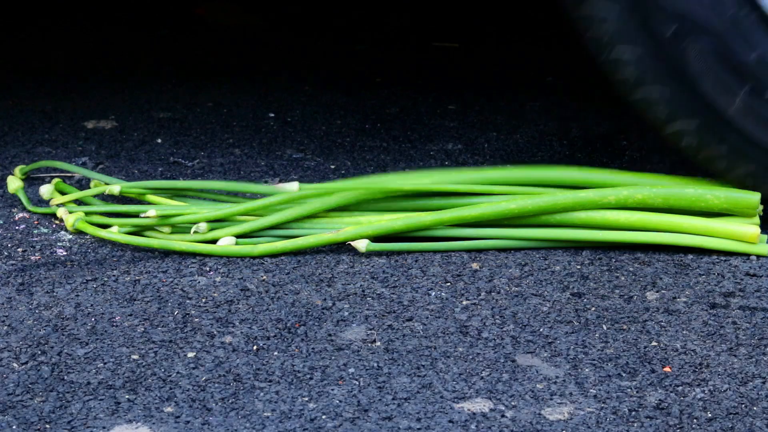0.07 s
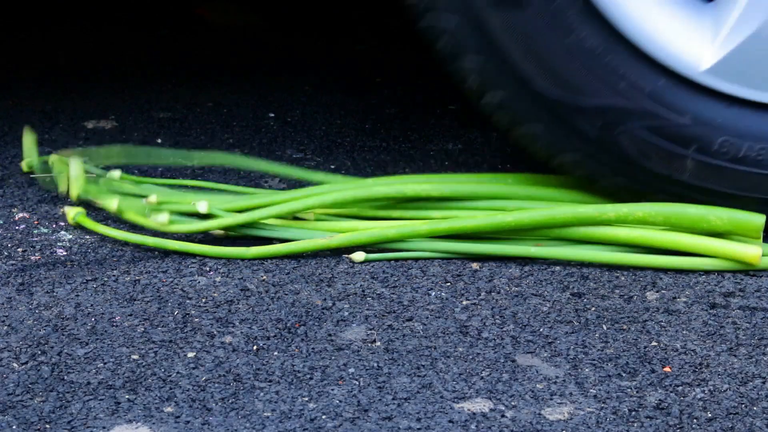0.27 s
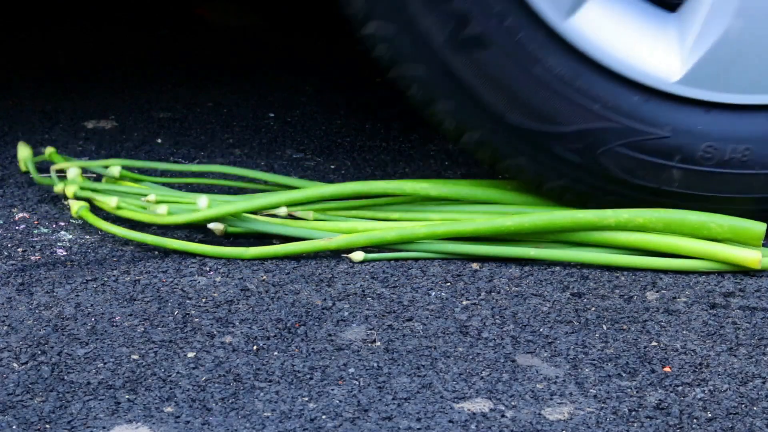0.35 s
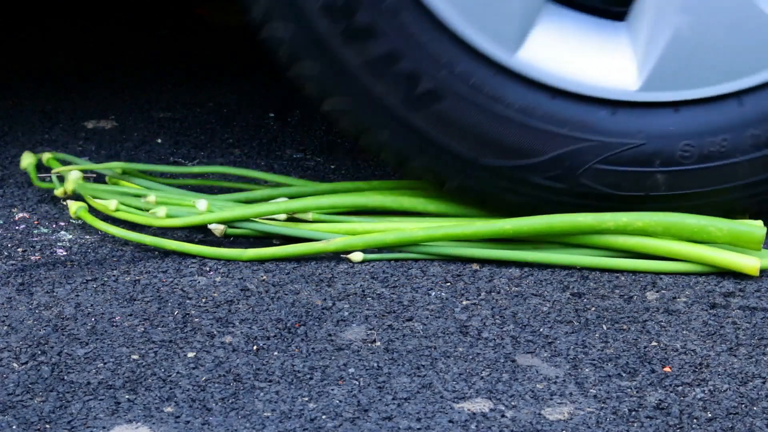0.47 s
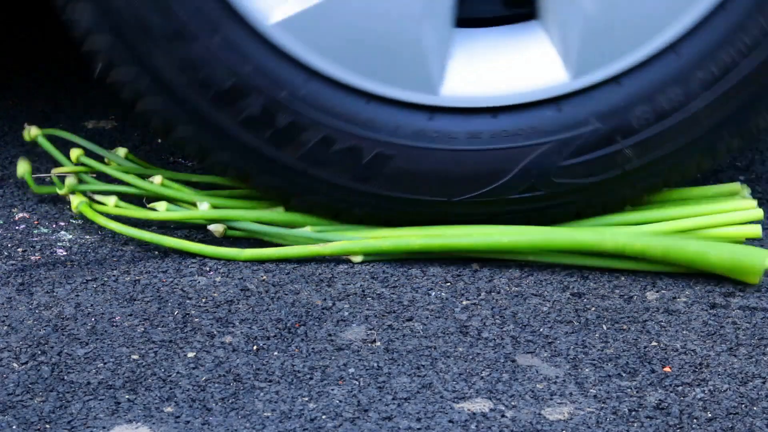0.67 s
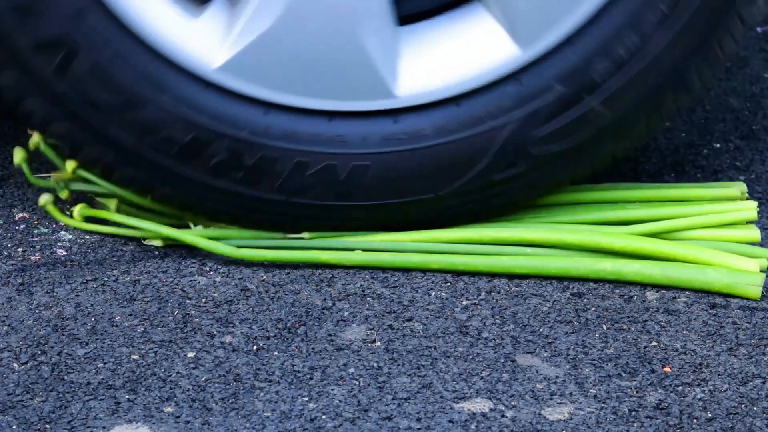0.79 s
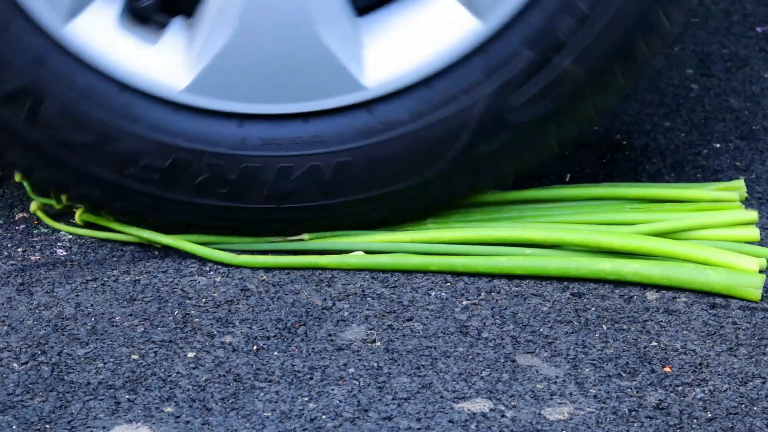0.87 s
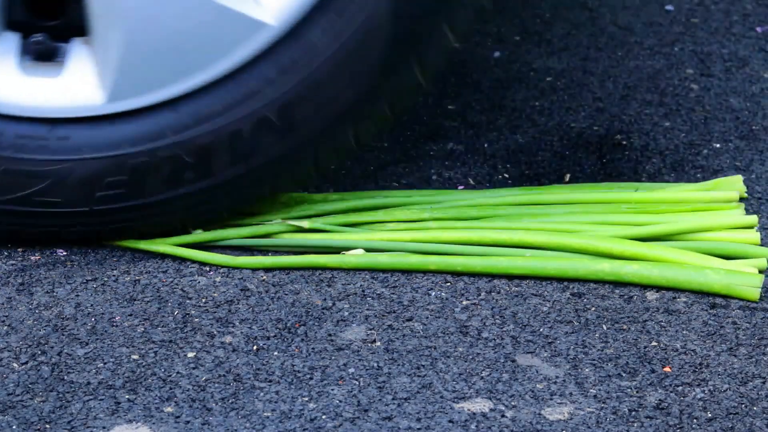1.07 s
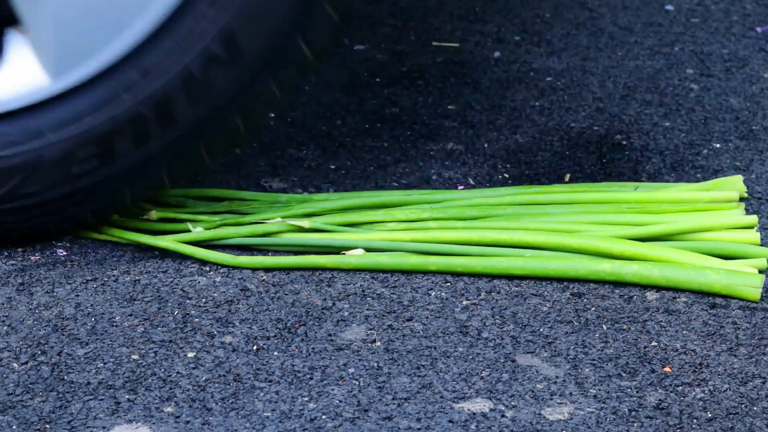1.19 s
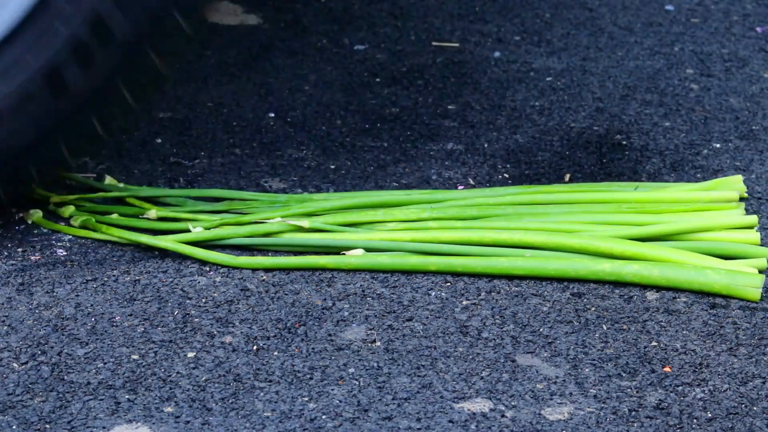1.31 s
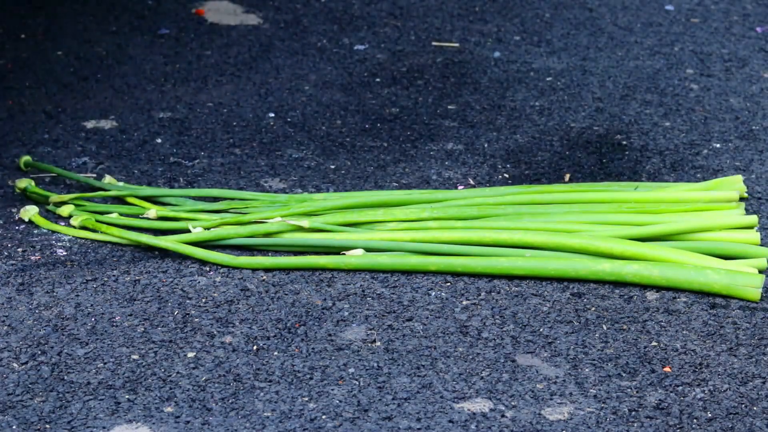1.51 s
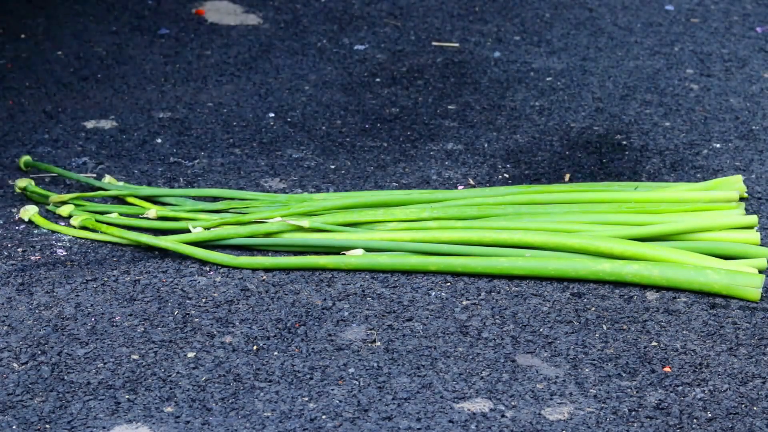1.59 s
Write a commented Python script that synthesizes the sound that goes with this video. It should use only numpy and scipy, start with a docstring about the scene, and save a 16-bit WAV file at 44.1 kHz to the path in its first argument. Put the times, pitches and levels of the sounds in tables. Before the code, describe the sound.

A car tyre crushes crisp green stalks on asphalt, heard very close in stereo outdoors. A dull, quiet grind of rubber on grit over low rumble leads in. From 0.2 s wet fibres crackle densely with hollow bursting pops, loudest near 0.48 and 0.78 s, some distorted, with short echoes under the car. After 0.85 s separate pops thin out until about 1.15 s; then only faint rumble remains to 1.6 s.

```python
"""A dull grind of rubber on grit over a low outdoor rumble opens the scene: filtered noise under level curves.
A car tyre then rolls slowly over crisp green stalks on asphalt, close to a stereo microphone.
Fibres tear in a dense wet crackle: random clicks and noise excite short-lived resonances.
Whole stalks burst with hollow pops: impulses excite longer resonances with noise cracks and a push of air.
The pops ring briefly between tyre and road as decaying noise, and the loudest overload the input."""
import sys
import numpy as np
from scipy import signal
from scipy.fft import rfft, irfft
from scipy.io import wavfile
from scipy.ndimage import map_coordinates

SR = 44100
rng = np.random.default_rng(int(sys.argv[2]) if len(sys.argv) > 2 else 0)


def nominal_scale(level):
    """Amplitude ratio for a level in decibels (scalar or array-like)."""
    x = np.asarray(level, float) / 20
    return 10 ** x


def bounce(signal):
    """Save signal as a 16-bit WAV file at the path given by the first command-line argument."""
    frames = np.transpose(np.atleast_2d(signal))
    limited = np.clip(frames, -1, 1)
    pcm = np.round(limited * 32767).astype(np.int16)
    wavfile.write(sys.argv[1], SR, pcm)


N = 72765  # length in samples

# Crushing of the fibres: t/s, level/dB, brightness about 2 kHz/(dB per octave)
CRUSHING = [(.16, -59, 5), (.19, -31.5, 5.5), (.235, -21, 6.5), (.3, -18.5, 5), (.4, -19, 3.5),
            (.478, -21.5, 4), (.515, -28, -0.5), (.55, -25, 3.5), (.61, -21, 3.5), (.67, -23.5, 7),
            (.7, -23.5, 4), (.725, -17, 6), (.77, -33.5, 3.5), (.81, -54, 9.5), (.85, -35.5, 2),
            (.9, -39, 2.5), (.93, -27.5, -2.5), (.96, -31.5, 0.5), (.98, -40, 8.5), (1.01, -31.5, -4),
            (1.06, -44, 14.5), (1.1, -38.5, 7), (1.16, -37.5, 2.5), (1.2, -42.5, 2), (1.26, -50, 4),
            (1.3, -69.5, 7)]
# Relative spectral density of the crackle: f/Hz, level/(dB per Hz)
TEAR_SPECTRUM = [(120, -53), (200, -16.5), (394, -21), (424, -18.5), (611, -16.5), (669, -28), (1120, 14.5),
                 (2640, 9), (3950, -0.5), (6970, -3), (9690, -16), (15900, -45.5)]
# Bursting stalks: t/s, relative level/dB, pitch f/Hz, crack relative to pop/dB, ring decay time T60/s
BURSTS = [(0.1908, -17, 2100, -12, 0.01), (0.2193, -13, 3280, -7, 0.004), (0.2357, -5, 1450, -10, 0.014),
          (0.2442, -8, 2370, -6, 0.006), (0.2652, -8, 1610, -11, 0.007), (0.2759, -9, 1450, -7, 0.012),
          (0.3105, -9, 1550, -12, 0.022), (0.3297, 3, 2670, -8, 0.005), (0.3383, 0, 2760, -13, 0.005),
          (0.3689, -7, 2570, -10, 0.005), (0.3857, -1, 1640, -14, 0.005), (0.411, -2, 1300, -14, 0.007),
          (0.4191, -7, 1510, -14, 0.009), (0.4384, -5, 2120, -15, 0.005), (0.4442, -2, 1140, -7, 0.008),
          (0.4669, -12, 760, -15, 0.012), (0.4843, 7, 900, -21, 0.009), (0.4871, -1, 1150, -17, 0.026),
          (0.5368, -12, 1230, -10, 0.011), (0.5474, -11, 2600, -7, 0.006), (0.5945, -12, 2630, -8, 0.016),
          (0.6285, -5, 1200, -7, 0.012), (0.633, -4, 2800, -9, 0.016), (0.6402, -4, 1880, -18, 0.007),
          (0.665, -4, 1280, -8, 0.016), (0.6695, -3, 2150, -9, 0.007), (0.6742, -5, 1210, -14, 0.011),
          (0.7165, -11, 4000, -8, 0.005), (0.723, -6, 2700, -4, 0.005), (0.7381, -7, 1570, -8, 0.009),
          (0.7531, -10, 1080, -13, 0.011), (0.7556, -6, 2690, -6, 0.005), (0.7706, 6, 1070, -18, 0.017),
          (0.7866, 5, 1050, -12, 0.012), (0.7892, -4, 1400, -20, 0.014), (0.8596, -10, 950, -12, 0.004),
          (0.8769, 5, 1000, -10, 0.005), (0.8954, -17, 2680, -9, 0.005), (0.9295, -16, 2220, -17, 0.015),
          (0.9794, -21, 1130, -7, 0.011), (1.0349, -11, 1700, -10, 0.003), (1.0522, 3, 2100, -12, 0.009),
          (1.0582, -5, 1500, -20, 0.008), (1.0724, 1, 1300, -28, 0.012), (1.104, -16, 1300, -22, 0.005),
          (1.1213, 3, 1400, -19, 0.009), (1.1525, 2, 1750, -11, 0.004), (1.2525, -35, 2590, -8, 0.005)]
# Spectral density of the crack: f/Hz, level/(dB per Hz)
CRACK_SPECTRUM = [(300, -62.5), (880, -30), (1500, -6), (2140, 8.5), (3540, -3), (7500, -2.5),
                  (13000, -23.5), (15900, -41.5)]
# Modes of the hollow bundle, which ring along with every burst: f/Hz, relative level/dB
BUNDLE_MODES = [(625, -15), (800, -15), (990, -14), (1260, -13), (1560, -12), (2240, -13), (2750, -15)]
# Relative spectral density of the scattered echoes under the car: f/Hz, level/(dB per Hz)
HOLLOW_SPECTRUM = [(240, -36), (400, -15.5), (781, -7.5), (1280, 10), (2370, -4.5), (3840, -27.5),
                   (7190, -15), (12000, -40.5), (15600, -65.5), (22000, -120)]
# Contact patch, moving from right to centre: t/s, left minus right level/dB, left lag/samples
CONTACT_PATH = [(.2, -4, 2.1), (.7, -2.5, 1.0), (1.2, -1, -.8)]
# Tread rolling up over bare grit: t/s, level/dB
ROLL_LEVEL = [(0, -45.5), (.06, -50.5), (.105, -43.5), (.15, -59), (.3, -51), (.9, -58.5), (1.3, -61)]
# Relative spectral density of the rumble: f/Hz, level/(dB per Hz)
RUMBLE_SPECTRUM = [(15, -46), (25, -30), (49, -3), (112, 2), (142, -12), (172, -4), (394, -12), (427, -17),
                   (462, -5.5), (1030, -19), (1350, -17), (1910, -35), (6370, -36), (15000, -58)]
# Rumble, which sinks under the crushing and returns: t/s, level/dB
RUMBLE_LEVEL = [(0, -47.5), (.2, -47), (.6, -53), (.85, -57.5), (1.1, -61.5), (1.3, -53), (1.65, -50.5)]
# Left-right likeness of the rumble: f/Hz, correlation/1
RUMBLE_LIKENESS = [(60, 0.99), (240, 0.9), (950, 0.49), (3770, -0.04), (15000, 0.02)]

TEARS_PER_S, TEAR_CYCLES = 6000, 5  # T60 of each tear resonance in cycles, at least 1 ms
CLUMP_DB, CLUMP_HZ = 2.5, 49  # spread and corner frequency of the clumping
JUICE_SHARE = .4  # share of squeezed-out juice hissing evenly between the tears
TEAR_WIDTH_SAMPLES, SHADOW_HZ = 1.3, 900  # lag between places on the tread; crossover of the level difference
POP_DB, CUT_SHARE, TOP_HZ = -3.5, .7, 6000  # a thin stalk radiates little below this share of its pitch
SPLITS_PER_S, SPLIT_DB, SPLIT_T60_S = 1200, -13, .06
BUNDLE_SPREAD_DB, BUNDLE_T60_S = 3.5, .0037  # the T60 is averaged geometrically with the stalk's own
CRACK_DB, CRACK_T60_S = 5, .006
PUSH_FOLLOWS = 2.5  # the push of air grows faster than the pop, in dB per dB
PUSH_DB, PUSH_HZ, PUSH_DB_PER_OCTAVE = -12, 260, -14  # slope over stalk pitch, about 1 kHz
HOLLOW_DB, HOLLOW_T60_S, HOLLOW_ALIKE = -19, .076, .64  # ALIKE: left-right correlation
ROLL_LOW_HZ, ROLL_HIGH_HZ = 148, 600
CLIP_LEVEL = .99  # full scale = 1


def rms_one(x):
    """Normalisation to unit root-mean-square value."""
    return x / np.sqrt(np.mean(x ** 2) + 1e-20)


def in_time(rows):
    """Linear interpolation of table columns over time."""
    s, *columns = np.transpose(rows)
    return [np.interp(np.arange(N) / SR, s, column) for column in columns]


def at_hz(points, hz):
    """Linear interpolation of a spectrum on a logarithmic frequency axis."""
    table_hz, values = np.transpose(points)
    return np.interp(np.log(hz), np.log(table_hz), values)


def coloured(x, spectrum):
    """Minimum-phase filtering: folding the cepstrum makes the given spectrum causal."""
    cepstrum = irfft(np.log(nominal_scale(at_hz(spectrum, np.arange(1, 2050) * SR / 4096))))
    cepstrum[1:2048] *= 2
    cepstrum[2049:] = 0
    impulse = irfft(np.exp(rfft(cepstrum)))
    if x.ndim > 1:
        impulse = impulse[None]
    return signal.fftconvolve(x, impulse, axes=-1)[..., :x.shape[-1]]


def drift(corner_hz):
    """Slow random fluctuation: white noise through two equal real poles, at unit rms."""
    r = np.exp(-2 * np.pi * corner_hz / SR)
    settled = signal.lfilter([1], [1, -2 * r, r * r], rng.standard_normal(N + 4000))[4000:]
    return rms_one(settled)


def ring(clicks, hz, t60):
    """Damped resonance: a unit click sets an exponentially decaying sine ringing."""
    r = nominal_scale(-60 / (max(t60, .001) * SR))
    w = 2 * np.pi * hz / SR
    return signal.lfilter([0, np.sin(w)], [1, -2 * r * np.cos(w), r * r], clicks + 1e-18)


def spread(mid, side, alike):
    """Partial coherence: sum and difference of two independent signals set the channel correlation."""
    return np.sqrt(1 + alike) * mid + np.sqrt(1 - alike) * side * [[1], [-1]]


def placed(x, offset=0):
    """Directional hearing: two ports receive a time difference and, in the treble, a level difference."""
    pan_db, lag = in_time(CONTACT_PATH)
    low = signal.lfilter(*signal.butter(1, SHADOW_HZ, fs=SR), x)
    channels = []
    for side in (1, -1):  # left, right
        shaded = low + nominal_scale(side * pan_db / 2) * (x - low)
        read_at = np.arange(N) - side * (lag + offset) / 2
        channels.append(map_coordinates(shaded, [read_at], order=3))
    return np.array(channels)


def tearing():
    """Shot noise on a bank of resonances: clumped tiny tears swell and die at their own pitch and place."""
    level_db, bright_db = in_time(CRUSHING)
    sizes = nominal_scale(CLUMP_DB * drift(CLUMP_HZ)) * rng.choice([-1, 1], N)
    tears = sizes * (rng.random(N) < TEARS_PER_S / SR)
    juice = rng.standard_normal((2, N))
    pitches = np.geomspace(300, 15000, 24)
    pitch_index, place_index = rng.integers(0, 24, N), rng.integers(0, 3, N)
    crackle = 0
    for place in range(3):
        rings = 0
        for k, hz in enumerate(pitches):
            clicks = rms_one(tears * (pitch_index == k) * (place_index == place))
            hiss = np.roll(juice[k % 2], 5000 * place)  # shifted to differ between places
            drive = (1 - JUICE_SHARE) * clicks + JUICE_SHARE * hiss
            t60 = TEAR_CYCLES / hz
            # two resonances in cascade give a swell before the decay
            band = rms_one(np.gradient(ring(ring(drive, hz, t60), hz, t60)))
            band_db = at_hz(TEAR_SPECTRUM, hz) + bright_db * np.log2(hz / 2000)
            rings = rings + nominal_scale(band_db) * np.sqrt(hz) * band  # bandwidth grows with pitch
        crackle = crackle + placed(rings, TEAR_WIDTH_SAMPLES * (place - 1))
    return nominal_scale(level_db) * rms_one(crackle)


def pops():
    """Impulse excitation: a burst rings stalk and bundle, pushes air and cracks; splitting strikes again."""
    body, push, crack, strikes = np.zeros((4, N + 4096))
    t = np.arange(4096) / SR
    noise = rng.standard_normal((len(BURSTS), 4096))
    mode_chance = rng.standard_normal((len(BURSTS), len(BUNDLE_MODES)))
    # a dying run of small cracks after each burst
    is_split = rng.random((len(BURSTS), 4096)) < SPLITS_PER_S / SR
    splits = is_split * nominal_scale(SPLIT_DB - 60 * t / SPLIT_T60_S)
    for (s, db, hz, crack_db, t60), hiss, chance, split in zip(BURSTS, noise, mode_chance, splits):
        i = int(s * SR)
        split = split * hiss[::-1] * np.sqrt(t60 / .012)  # stronger after long rings
        burst = -1.0 * (t == 0)
        stalk = ring(burst, hz, t60) + ring(split, hz, t60 / 3)
        bundle = 0
        for (mode_hz, mode_db), c in zip(BUNDLE_MODES, chance):
            mode = ring(burst + split, mode_hz, np.sqrt(t60 * BUNDLE_T60_S))
            bundle = bundle + nominal_scale(mode_db + BUNDLE_SPREAD_DB * c) * mode
        band_hz = [min(CUT_SHARE * hz, 1000), TOP_HZ]
        radiation = signal.butter(3, band_hz, "band", fs=SR, output="sos")
        body[i:i + 4096] += nominal_scale(db + POP_DB) * signal.sosfilt(radiation, stalk + bundle)
        # the push of air also follows the crack
        push_db = PUSH_FOLLOWS * db + PUSH_DB + PUSH_DB_PER_OCTAVE * np.log2(hz / 1000) + crack_db
        push[i] = -nominal_scale(push_db)
        crack[i:i + 4096] += nominal_scale(db + crack_db + CRACK_DB - 60 * t / CRACK_T60_S) * hiss
        strikes[i] = nominal_scale(db) * np.sqrt(t60 / .02)  # longer rings leave more echo
    air = ring(push, PUSH_HZ, 1.5 / PUSH_HZ)
    direct = body + air + coloured(crack, CRACK_SPECTRUM)
    return placed(direct[:N]) + hollow(strikes[:N])


def hollow(strikes):
    """Diffuse reverberation: each pop leaves dense, exponentially dying, partly coherent echoes."""
    power = signal.lfilter([0, 1], [1, -nominal_scale(-120 / (HOLLOW_T60_S * SR))], strikes ** 2)
    mid, side = rms_one(coloured(rng.standard_normal((2, N)), HOLLOW_SPECTRUM))
    return nominal_scale(HOLLOW_DB) * np.sqrt(power) * spread(mid, side, HOLLOW_ALIKE)


def rolling():
    """Friction noise: band-limited noise under an uneven level gives the dull grind of rubber on grit."""
    band = signal.butter(2, [ROLL_LOW_HZ, ROLL_HIGH_HZ], "band", fs=SR, output="sos")
    grind = rms_one(signal.sosfilt(band, rng.standard_normal(N)))
    uneven_db = 1.3 * drift(23)
    return nominal_scale(in_time(ROLL_LEVEL)[0] + uneven_db) * grind


def rumble():
    """Diffuse field of distant traffic and air: coherent in the bass, nearly incoherent in the treble."""
    hz = np.maximum(np.arange(N // 2 + 1) * SR / N, 1)
    mid, side = rfft(rng.standard_normal((2, N))) * nominal_scale(at_hz(RUMBLE_SPECTRUM, hz))
    both = irfft(spread(mid, side, at_hz(RUMBLE_LIKENESS, hz)), N)
    return nominal_scale(in_time(RUMBLE_LEVEL)[0]) * rms_one(both)


def scene():
    """Linear superposition of all sources at the microphone."""
    return tearing() + pops() + rolling() + rumble()


def top_cut(x):
    """Nothing passes above the cut-off."""
    return signal.sosfilt(signal.butter(12, 16030, fs=SR, output="sos"), x)


def record(dry):
    """Saturation: the input bends the loudest pops smoothly against a ceiling."""
    bent = np.tanh((np.abs(dry) / CLIP_LEVEL) ** 3) ** (1 / 3)
    limited = CLIP_LEVEL * bent * np.sign(dry)
    return top_cut(limited)


dry = scene()
out = record(dry)
bounce(out)
```